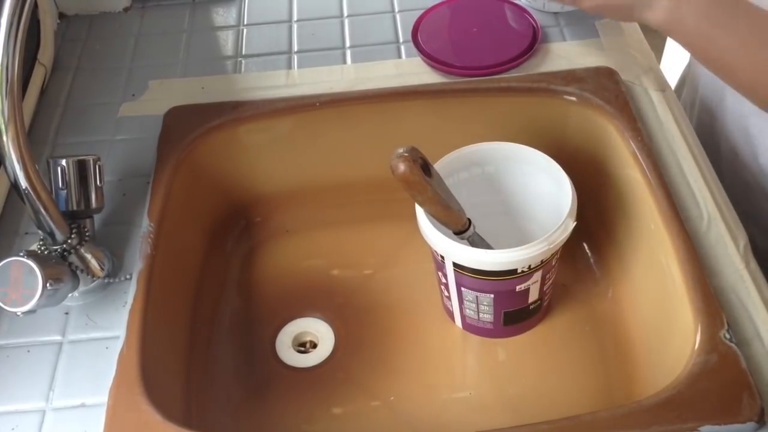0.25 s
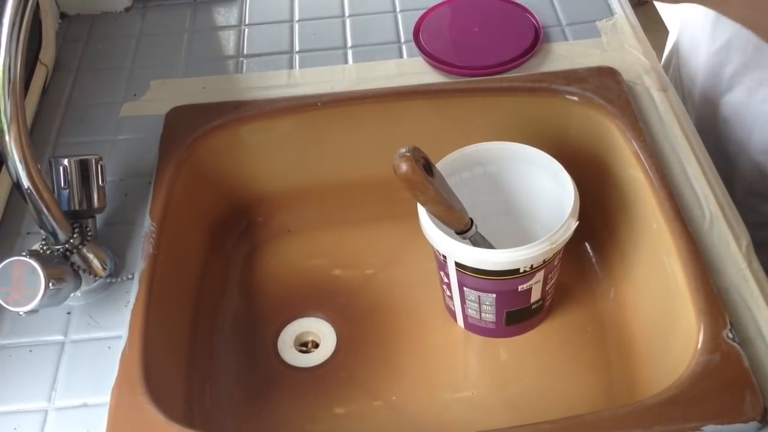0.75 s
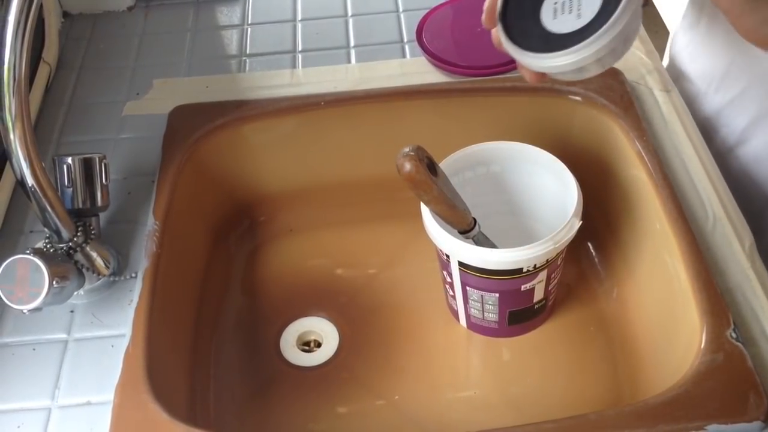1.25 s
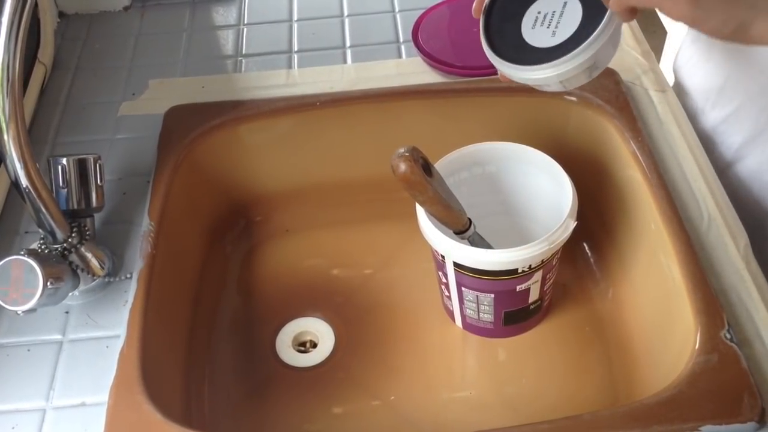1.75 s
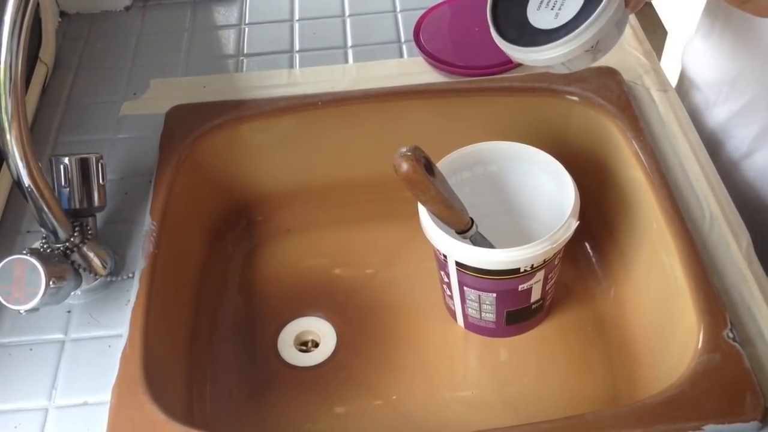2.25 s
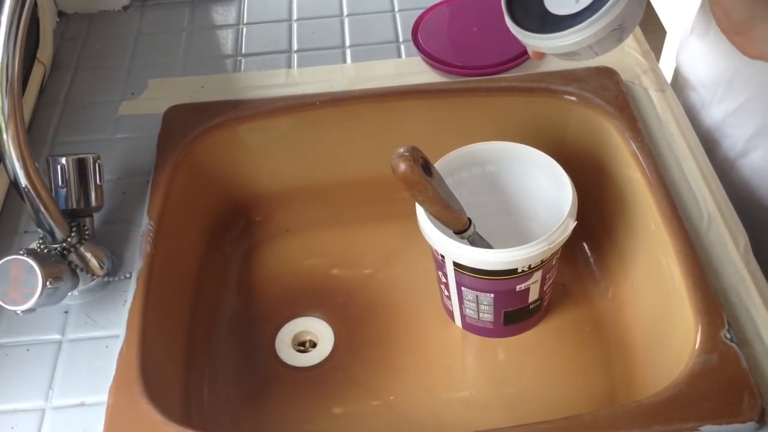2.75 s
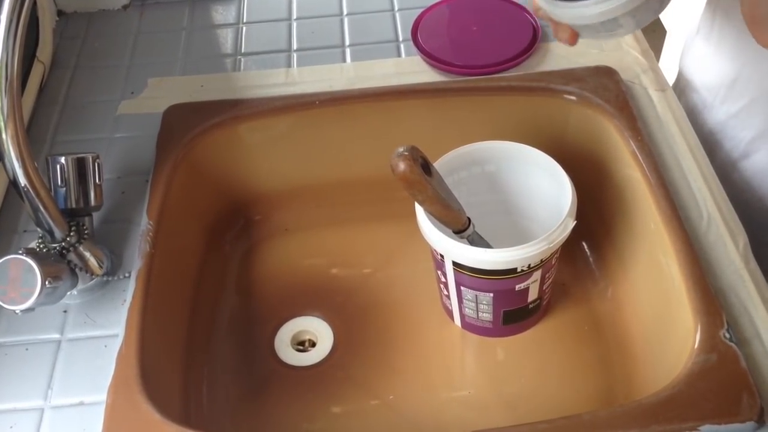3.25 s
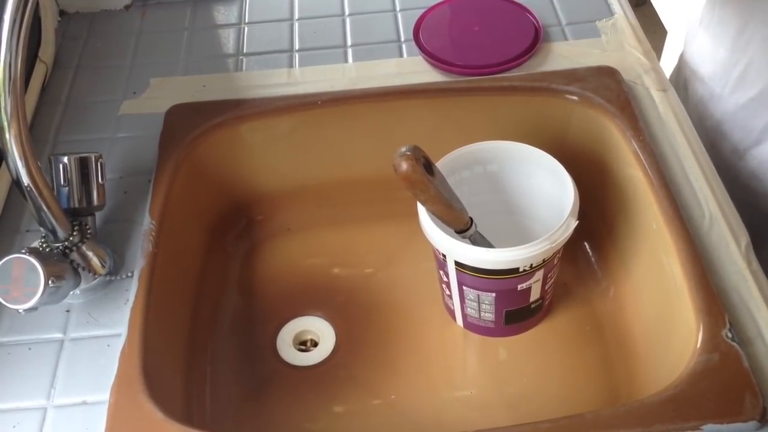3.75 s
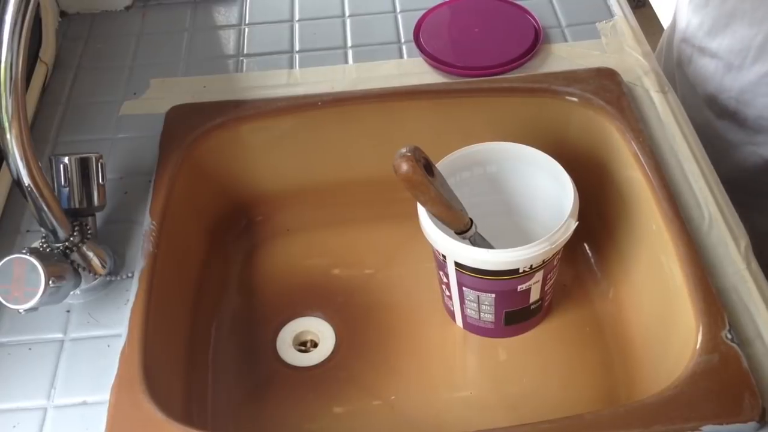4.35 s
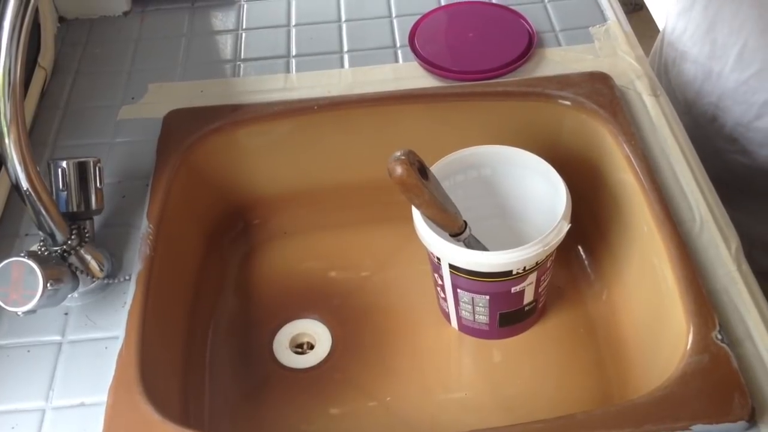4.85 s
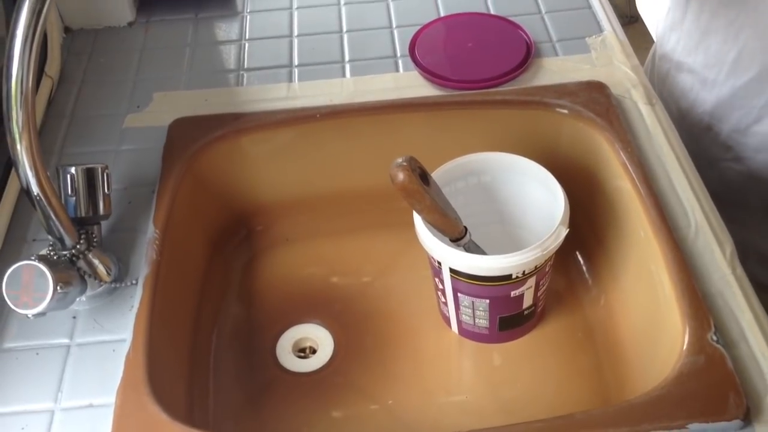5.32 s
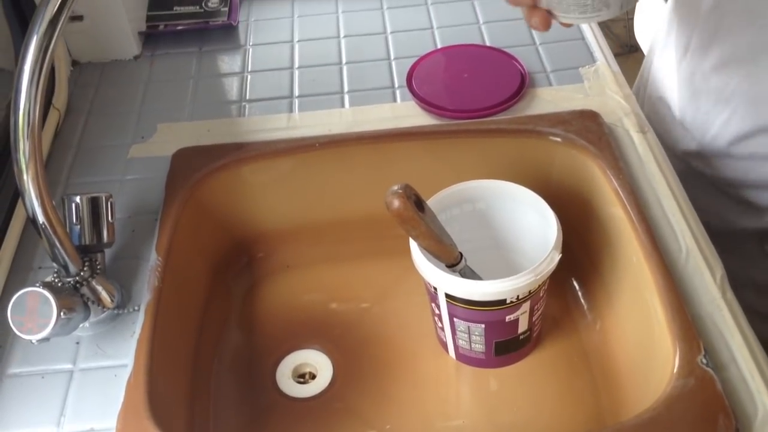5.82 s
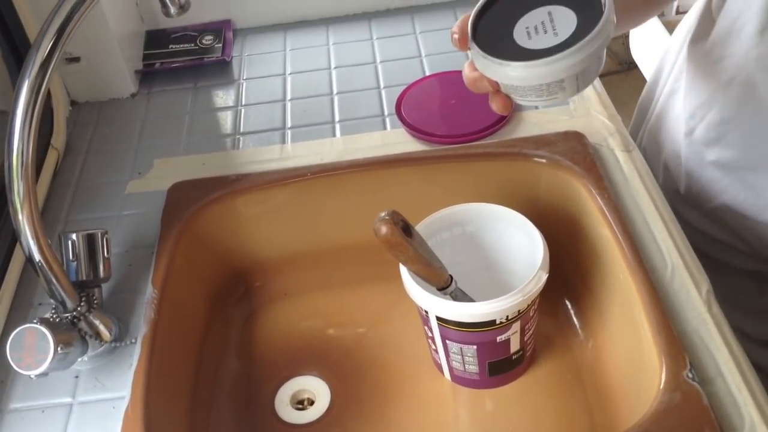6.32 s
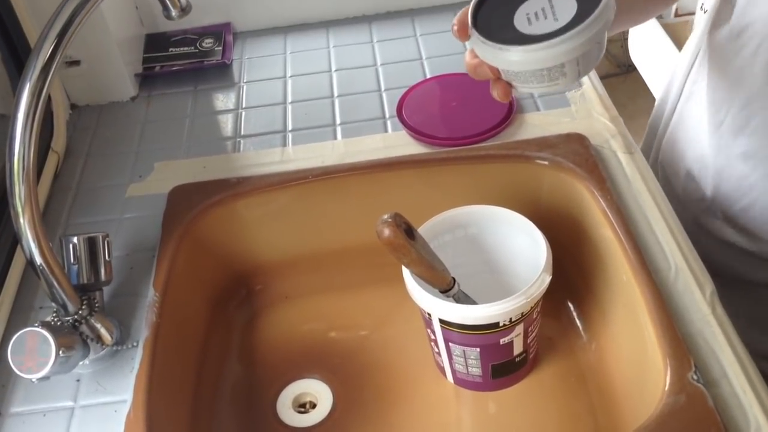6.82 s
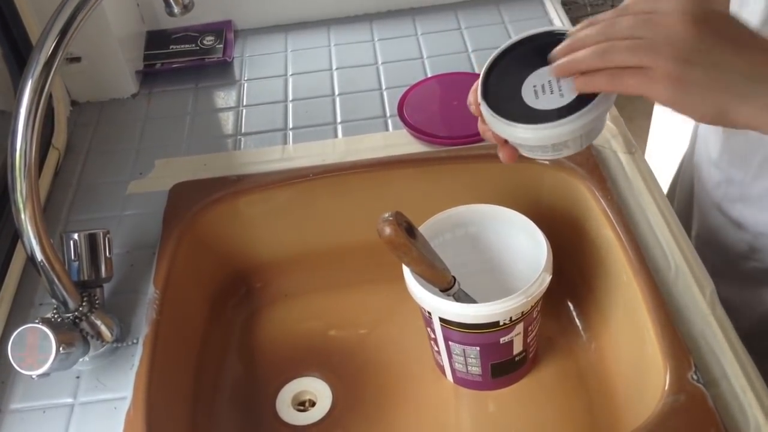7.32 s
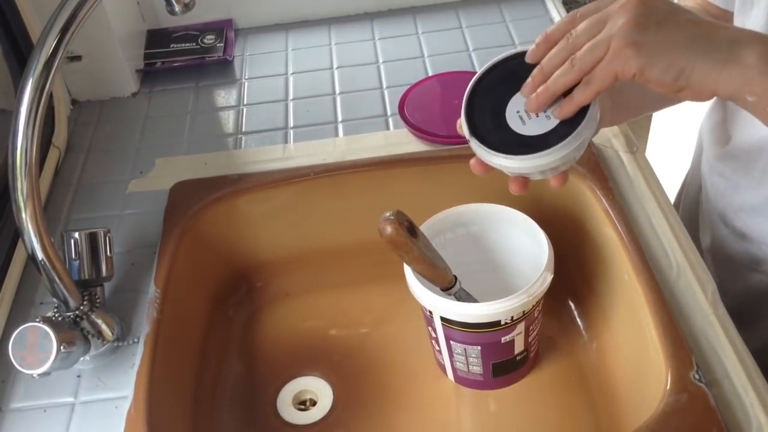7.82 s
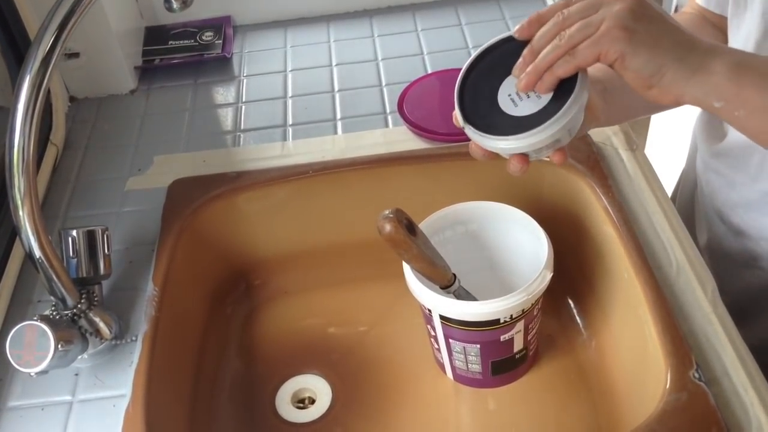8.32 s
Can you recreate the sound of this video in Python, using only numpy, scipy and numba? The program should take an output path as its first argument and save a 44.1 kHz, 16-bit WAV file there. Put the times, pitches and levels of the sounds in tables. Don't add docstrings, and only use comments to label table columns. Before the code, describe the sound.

Close handling of a small plastic pot over a sink. Soft finger brushes lead to a quick hollow knocking near one second, then several very sharp lid snaps between about two and a half and three seconds. Light ticks and a dull knock follow, then two more hard snaps around five seconds. Afterwards only faint rubs and a small click. Tiles give close, bright echoes; birds chirp faintly outside over street murmur and microphone hiss.

```python
import sys
import numpy as np
from scipy import signal
from scipy.fft import rfft, irfft, next_fast_len
from scipy.io import wavfile
from scipy.ndimage import uniform_filter1d
from numba import njit

SR = 44100
rng = np.random.default_rng(int(sys.argv[2]) if len(sys.argv) > 2 else 0)


def gain_from_db(level_db):
    decades = np.asarray(level_db, float) / 20
    return 10 ** decades


def to_wav(sig):
    pcm = np.clip(np.atleast_2d(sig), -1, 1) * 32767
    pcm = np.round(pcm).astype(np.int16)
    wavfile.write(sys.argv[1], SR, pcm.T)


N = 377937

DRIVE_DB = 1.5


@njit
def band_pass(x, hz, width):
    y = np.empty(len(x))
    band, low = 0., 0.
    g, k = np.tan(np.pi * hz / SR), width / hz
    for i in range(len(x)):
        v = (band + g * (x[i] - low)) / (1 + g * (g + k))
        band = 2 * v - band
        low += 2 * g * v
        y[i] = k * v
    return y


def steep(x, hz, width):
    once = band_pass(x, 1. * hz, 1. * width)
    return band_pass(once, 1. * hz, 1. * width)


def unit(x):
    return x / np.sqrt(np.mean(x ** 2))


def add(track, s, x):
    i = int(s * SR)
    track[i:i + len(x)] += x[:N - i]


def walk(rate, size):
    hold = int(SR / rate)
    steps = np.repeat(rng.standard_normal(size // hold + 1), hold)
    return 1.1 * uniform_filter1d(steps, hold)[:size]


def high_pass(x, hz):
    return signal.sosfilt(signal.butter(4, hz, "high", fs=SR, output="sos"), x)


def click(modes, count):
    f = np.fft.rfftfreq(count, 1 / SR) + 1
    power = 0
    for hz, width, db in modes:
        detune = (f - hz ** 2 / f) / width
        power = power + (gain_from_db(db) * SR / width) ** 2 / (1 + detune ** 2) ** 2
    cepstrum = irfft(.5 * np.log(power))
    cepstrum[1:count // 2] *= 2
    cepstrum[count // 2 + 1:] = 0
    return irfft(np.exp(rfft(cepstrum)))


# delays in seconds, then their levels in dB.
ECHO_S = [.0013, .0025, .0032, .0047, .0067, .0083, .0113]
ECHO_DB = [-7, -5.5, -6, -5.5, -6, -9.5, -8]
# centre in Hz, time to fall by 60 dB in seconds, level in dB.
TAIL = [(200, 0.052, -6), (714, 0.3, -2.5), (1800, 0.13, 1), (4037, 0.17, -1.5), (7486, 0.19, -7),
        (12000, 0.14, 2)]


def room(x, count=12288):
    t = np.arange(count) / SR
    onset = np.clip(t / 0.0014, 0, 1)
    response = np.zeros(count)
    response[0] = 1
    shading_db = 1.5 * rng.standard_normal(len(ECHO_S))
    for s, db in zip(ECHO_S, ECHO_DB + shading_db):
        add(response, s, gain_from_db(db) * np.array([1., -.3]))
    scatter_t60_s, scatter_db = 0.054, 4.5
    scatter = rng.standard_normal(count) * gain_from_db(-60 * t / scatter_t60_s)
    response += 0.087 * gain_from_db(scatter_db) * onset * scatter
    for hz, t60, db in TAIL:
        noise = steep(rng.standard_normal(count), hz, 1.1 * hz)
        response += 0.075 * gain_from_db(db) * onset * noise * gain_from_db(-60 * t / t60)
    return signal.fftconvolve(x, response)[:N]


# frequency in Hz, level per Hz in dB.
FLOOR = [(22, -51), (79, -26), (169, -4), (260, -5.5), (421, -7.5), (1020, -9), (1780, -15), (15500, -21.5)]
# time in seconds, level in dB.
SWELL = [(0, 0.7), (1, 2.5), (2, 1.7), (3, 0.8), (4.001, 2), (5, 1.8), (6, 2.15), (7, -0.6), (8, 1.3),
         (8.6, 0.2)]


def floor():
    size = next_fast_len(N)
    f = np.fft.rfftfreq(size, 1 / SR) + 1
    hz, db = np.transpose(FLOOR)
    colour = gain_from_db(np.interp(np.log(f), np.log(hz), db))
    spectrum = rfft(rng.standard_normal(size)) * colour
    whole = irfft(spectrum, size)[:N]
    hum = irfft(spectrum / (1 + (f / 300) ** 6), size)[:N]
    hiss = irfft(spectrum / (1 + (2200 / f) ** 4), size)[:N]
    murmur = whole - hum - hiss
    busy = np.interp(np.arange(N) / SR, *np.transpose(SWELL))
    swell = 0.46 * busy
    mix = hum * gain_from_db(swell + 0.98 * walk(14, size=N))
    mix += murmur * gain_from_db(swell + 0.68 * walk(6.8, size=N))
    mix += hiss * gain_from_db(busy + .4 * walk(4.7, size=N))
    return gain_from_db(-60.5 - DRIVE_DB) / np.std(whole) * mix


# start in seconds, length in seconds, middle pitch in Hz, level in dB.
HELD = [(.13, .24, 3600, -66.5), (.39, .05, 4080, -59), (.515, 0.085, 6600, -61), (.53, .04, 4520, -63),
        (.545, 0.058, 3600, -56), (.64, .04, 4620, -58), (.84, 0.097, 6740, -62), (1.11, 0.12, 3150, -60),
        (1.385, .11, 3710, -68), (1.59, 0.076, 4780, -69), (1.86, 0.16, 4990, -64),
        (2.33, .08, 5740, -67.5), (3.65, 0.3, 4800, -73.5), (3.83, .07, 2860, -68)]
SAGGING = [(.862, 0.056, 3566, -56.5), (.92, 0.044, 3300, -59), (1.17, 0.074, 3697, -51.5),
           (1.215, 0.054, 3506, -54), (1.29, .09, 3240, -62), (2.03, 0.053, 5200, -71)]
FALLING = [(.085, .04, 4600, -58), (.49, .04, 7400, -65), (.65, .085, 5650, -60), (2.708, .04, 3780, -55),
           (5.69, .045, 4770, -64)]
RISING = [(.04, .08, 3590, -56), (4.57, 0.054, 3800, -63), (2.53, 0.054, 3900, -66),
          (5.755, 0.034, 3750, -63), (6.185, 0.05, 3910, -59), (7.445, 0.041, 4000, -62.5),
          (8.26, .05, 11760, -63)]
CHIPS = [(.705, 0.031, 3840, -57), (1.652, 0.027, 3620, -60), (3.715, 0.029, 3800, -64),
         (4.66, .02, 5240, -56)]
BURRED = [(5.12, 0.073, 2650, -66), (5.28, 0.065, 3750, -55), (5.89, 0.11, 3580, -57),
          (7.3, .075, 3950, -62), (7.935, 0.116, 2550, -56.5), (8.27, 0.063, 3970, -59)]
RASPS = [(.0, 0.15, 3330, -60.5), (.25, 0.29, 4000, -66), (.56, 0.13, 3500, -57), (1.48, .08, 4780, -66),
         (8.25, .2, 2860, -68)]
# the notes, glide in Hz per second, hoarseness from 0 to 1.
SONG = [(HELD, 0, .15), (SAGGING, -2000, .12), (FALLING, -6500, .15), (RISING, 6000, .3),
        (CHIPS, 30000, .15), (BURRED, -1000, .62), (RASPS, -1500, .85)]


def bird_note(length, mid_hz, db, glide, hoarse):
    n = int(length * SR)
    waver = walk(120, size=16384)[:n]
    flutter = walk(300, size=16384)[:n]
    breath = rng.standard_normal(16384)
    hz = mid_hz + glide * length * np.linspace(-.5, .5, n)
    hz = hz * (1 + .004 * waver + (.008 + .04 * hoarse) * flutter)
    whistle = np.sin(2 * np.pi * np.cumsum(hz) / SR) * gain_from_db(1.5 * waver + 2.2 * flutter)
    rasp = unit(steep(breath, hz.mean(), 300 + 1300 * hoarse ** 2))[:n]
    mix = (1 - hoarse ** 2) * whistle + .9 * hoarse ** 1.4 * rasp
    shape = np.sin(np.pi * np.linspace(0, 1, n) ** .7) ** .6
    return gain_from_db(db - 5.5) * shape * mix


def birds():
    out = np.zeros(N)
    for notes, glide, hoarse in SONG:
        for s, length, mid_hz, db in notes:
            add(out, s, bird_note(length, mid_hz, db, glide, hoarse))
    return out


# start in seconds, peak in dB, pitch in Hz.
BUMPS = [(0.028, -61, 172), (0.998, -62, 280), (1.095, -52, 159), (1.113, -52, 176), (1.137, -52.5, 270),
         (1.424, -60, 204), (1.926, -57, 253), (2.047, -61, 245), (2.098, -57, 226), (2.19, -66, 186),
         (2.301, -64, 200), (3.298, -57, 173), (5.802, -57, 167), (7.653, -59, 251), (7.989, -70, 159.5),
         (8.048, -58, 264), (8.139, -52.5, 228), (7.885, -51, 215), (7.93, -56, 225)]


def bumps():
    out = np.zeros(N)
    for s, db, hz in BUMPS:
        add(out, s, gain_from_db(db - 8.5) * click([(hz, 55, 0)], count=8192))
    return out


def rub(length, db, hz):
    grain_db = 4 * walk(400, size=16384)
    noise = rng.standard_normal(16384) * gain_from_db(grain_db)
    noise = high_pass(band_pass(noise, 0.62 * hz, 0.66 * hz), .55 * hz)
    u = np.linspace(0, 1, int(1.16 * length * SR))
    shape = np.sin(np.pi * u ** 0.53) ** 0.75
    return room(gain_from_db(db - 6) * unit(noise)[:len(u)] * shape)


# middle in seconds, length in seconds, rms level in dB.
FLICKS = [(0.225, 0.047, -69), (0.292, 0.034, -63), (0.338, 0.053, -62), (0.655, 0.059, -62),
          (0.892, 0.11, -60), (0.914, 0.028, -55), (0.97, 0.038, -51), (1.215, 0.03, -56),
          (1.345, 0.057, -60), (1.491, 0.054, -62), (1.719, 0.027, -66), (2.359, 0.062, -67),
          (2.417, 0.024, -59), (3.386, 0.017, -66.5), (3.461, 0.0099, -66), (4.109, 0.072, -64),
          (4.17, .07, -58), (4.238, 0.041, -65.5), (4.664, .035, -60.5), (7.42, .05, -69),
          (7.79, 0.027, -68), (8.304, 0.046, -60.5)]


def flicks():
    out = np.zeros(N)
    for s, length, db in FLICKS:
        add(out, s - 0.44 * length, rub(length, db, hz=8020))
    return out


# middle in seconds, length in seconds, rms level in dB, centre in Hz.
RUBS = [(1.087, 0.094, -52, 4940), (1.596, 0.14, -73, 5900), (4.157, .06, -67, 3600),
        (4.6, 0.18, -78, 5450), (5.602, .2, -71.5, 4500), (5.816, .06, -65, 5970), (6.149, .1, -68, 5840),
        (7.347, 0.13, -67.5, 5500), (7.635, 0.044, -64.5, 6500), (8.14, 0.037, -68, 4440),
        (8.331, .12, -70.5, 4180)]


def rubs():
    out = np.zeros(N)
    for s, length, db, hz in RUBS:
        add(out, s - 0.44 * length, rub(length, db, hz))
    return out


# start in seconds, push length in seconds, then the level in dB that goes
KNOCKS = [(1.049, 0.016, -62, -59, -47), (1.0685, 0.017, -44, -39, -46.5), (1.088, 0.017, -40, -48, -51),
          (1.107, 0.021, -49, -52, -54), (1.127, 0.014, -54, -59, -60), (1.142, 0.038, -56, -54.5, -59.5),
          (1.169, 0.071, -64.5, -69, -68), (1.481, 0.071, -68.5, -82, -82), (3.5, 0.049, -80, -68, -77),
          (4.043, 0.053, -67, -70, -74), (4.744, 0.047, -54.5, -60, -75), (4.762, 0.034, -53.5, -59, -74),
          (4.793, 0.021, -55, -64.5, -71), (4.81, 0.013, -60.5, -79, -77)]
# frequency in Hz, width in Hz, level in dB.
BODY = [
    [(635, 75, 0), (510, 80, -4), (170, 70, -13), (270, 90, -14), (380, 80, -11)],
    [(850, 110, 0), (1030, 90, -1)],
    [(1180, 100, 0), (1070, 90, -5)],
    [(1740, 170, 0), (2200, 200, -7), (2700, 400, -14)],
]


def knocks():
    out = np.zeros(N)
    for s, length, low_db, hollow_db, wall_db in KNOCKS:
        shares = low_db, wall_db - 2, hollow_db, wall_db
        n = int(length * SR)
        push = np.zeros(4096)
        push[:n] = rng.standard_normal(4096)[:n] * np.linspace(1, .3, n) ** 2
        spread = np.sqrt((n + 300) / len(push))
        for share, group in zip(shares, BODY):
            for hz, width, db in group:
                ring = unit(steep(push, hz, 0.79 * width))
                add(out, s, gain_from_db(share + db - 3.5) * spread * ring)
    return out


# frequency in Hz, width in Hz.
LID = [
    (205, 100),
    (1500, 2800),
    (3500, 3230),
    (12500, 9000),
]
# frequency in Hz, width in Hz, level in dB.
FACE = [(7900, 4800, 1), (5660, 2600, -15)]


def strike(db, thud, rim, edge, freed=()):
    wall = (thud + rim) / 2 + 1
    modes = FACE + list(freed)
    for (hz, width), share in zip(LID, (thud, wall, rim, edge)):
        modes.append((hz, width, share))
    return room(gain_from_db(db - 5.5) * click(modes, count=4096))


STRIKE_LAG_S = .0007

# start in seconds, peak in dB, thud share in dB, edge share in dB.
TICKS = [(1.0511, -42.5, -11, -21), (1.34, -47, -28, -26), (1.5402, -53.5, -7, -30),
         (1.926, -54.5, -11, 0.5), (2.138, -44, -13, -12), (2.1675, -53, -1.5, -15),
         (2.8619, -44.5, -16, 7.5), (2.9561, -44, -13, 3), (3.0683, -46, -17, -8),
         (3.1188, -53, -6.5, -15.5), (3.473, -44, -15, -18.5), (4.073, -50.5, -22, -11),
         (4.3647, -48.5, -7, -27), (4.461, -47.5, -8.5, -2.5), (4.7398, -53, -17, -6.5),
         (7.0186, -47, -24, -2), (7.8464, -57, -6, 8), (7.9417, -57, 4, -21)]


def ticks():
    out = np.zeros(N)
    for s, db, thud, edge in TICKS:
        rim = -5 - 0.23 * edge
        add(out, s + STRIKE_LAG_S, strike(db, thud, rim, edge))
    return out


# start in seconds, peak in dB, then the shares in dB of thud, rim and thin edge.
SNAPS = [(2.421, -9.5, -23, -13, 5), (2.6416, -27, -18.5, -32, 0.5), (2.6431, -28, -25.5, -1.5, -8),
         (2.7469, -22, -41.5, -14, -0.5), (2.7548, -5.5, -47.5, -22, -14), (3.1783, -4.5, -51, -14, -9),
         (4.9832, -14, -44, -5, 5.5), (5.214, -5.5, -34, -10, -12.5), (7.8827, -40, -21, -11.5, -14),
         (7.887, -33.5, -44, -6.5, -10)]
# time of the snap in seconds,
# frequency in Hz, width in Hz, level in dB against the peak.
GRIP = [(2.421, 2250, 816, -21), (2.421, 5100, 2400, -5.5), (2.421, 440, 200, -37),
        (2.6435, 4460, 1800, -5), (2.755, 7400, 2600, -5.5), (2.755, 12600, 1500, -13.5),
        (5.214, 1130, 700, -33.5), (5.214, 3050, 900, -19.5), (3.178, 3750, 900, -22),
        (3.178, 8500, 2800, -2), (4.984, 5550, 2010, -7), (4.984, 504, 200, -36), (4.984, 2510, 604, -24),
        (5.214, 4550, 2010, -7), (5.214, 12300, 3040, -3), (5.214, 339, 300, -37)]


def snaps():
    out = np.zeros(N)
    for s, db, thud, rim, edge in SNAPS:
        freed = [mode for snap_s, *mode in GRIP if abs(snap_s - s) < .0025]
        add(out, s + STRIKE_LAG_S, strike(db, thud, rim, edge, freed))
    return out


def scene():
    background = floor()
    song = birds()
    hollow = bumps() + knocks()
    hollow += gain_from_db(-15) * room(hollow)
    near = hollow + flicks() + rubs() + ticks() + snaps() + gain_from_db(-6.5) * room(song)
    return (high_pass(near, 135) + song + background)[None]


def roll_off(x):
    return signal.sosfilt(signal.butter(12, 16510, fs=SR, output="sos"), x)


def record(dry):
    top_hz, skew, full_scale = 15250, 0.059, .92
    x = signal.sosfilt(signal.ellip(8, .2, 60, top_hz, fs=SR, output="sos"), dry)
    x = gain_from_db(DRIVE_DB) * x
    mix = np.clip(x + skew * x ** 4, -full_scale, full_scale)
    return roll_off(mix)


dry = scene()
out = record(dry)
to_wav(out)
```